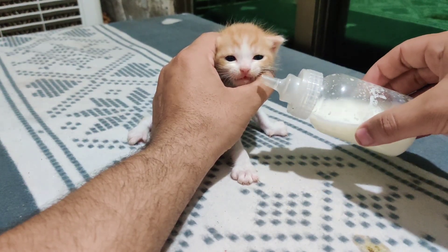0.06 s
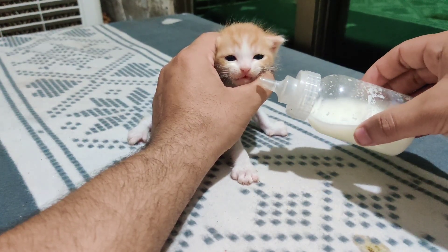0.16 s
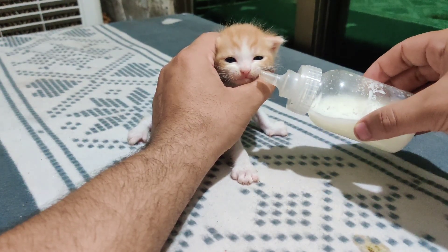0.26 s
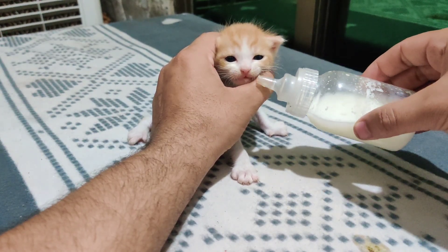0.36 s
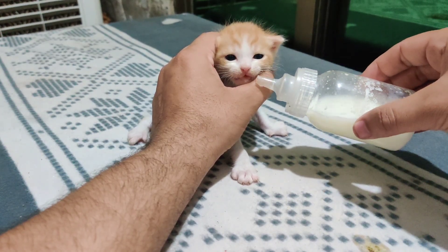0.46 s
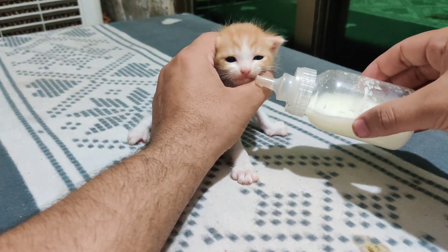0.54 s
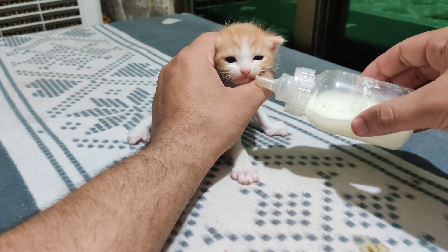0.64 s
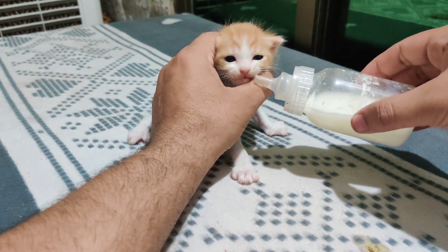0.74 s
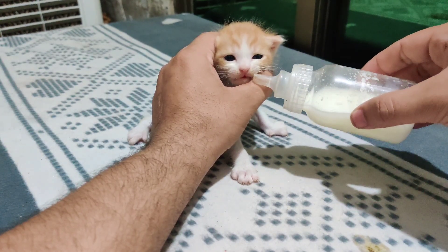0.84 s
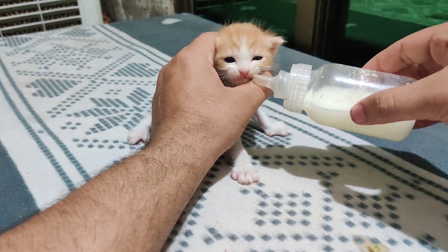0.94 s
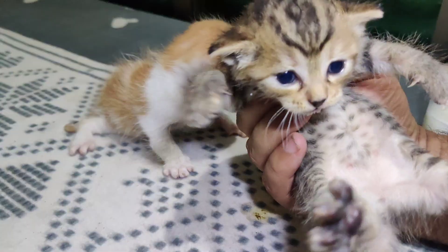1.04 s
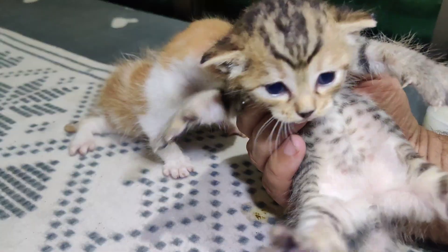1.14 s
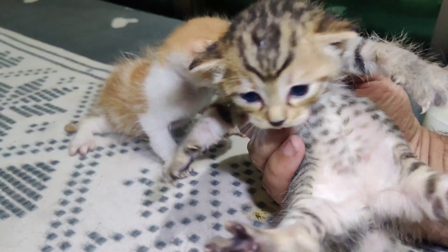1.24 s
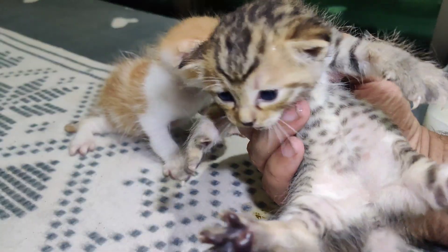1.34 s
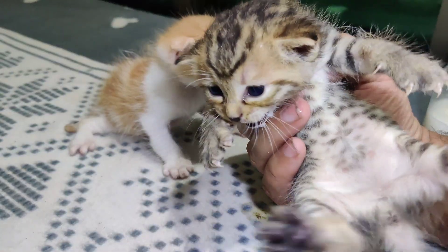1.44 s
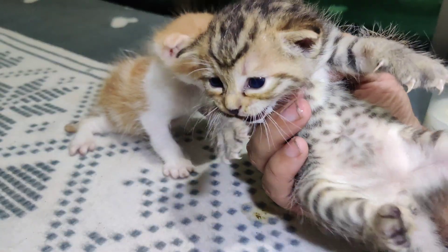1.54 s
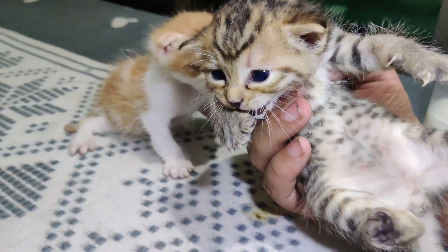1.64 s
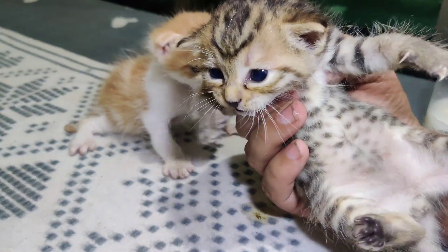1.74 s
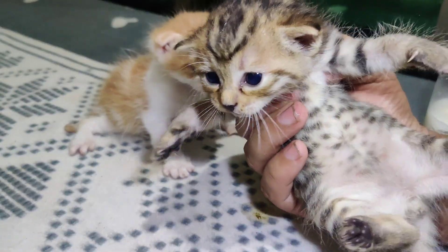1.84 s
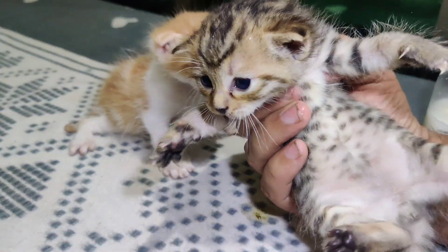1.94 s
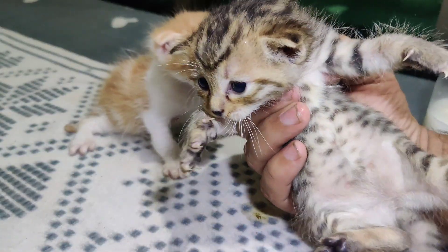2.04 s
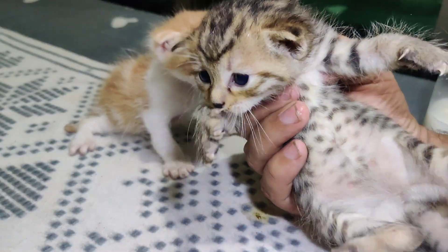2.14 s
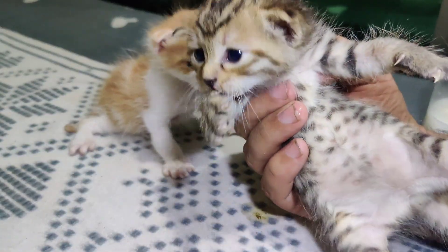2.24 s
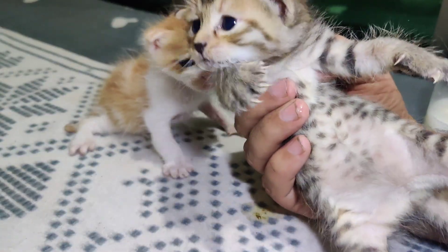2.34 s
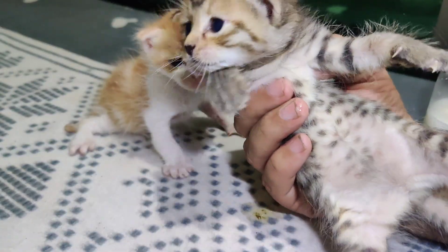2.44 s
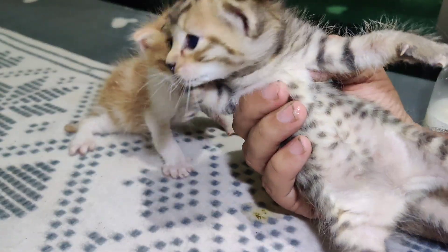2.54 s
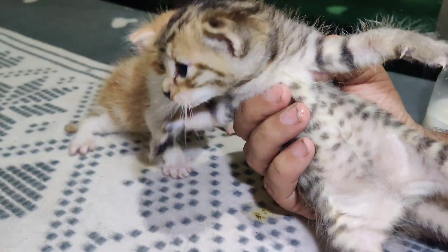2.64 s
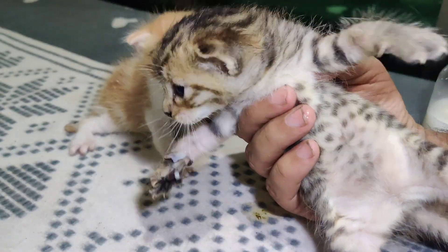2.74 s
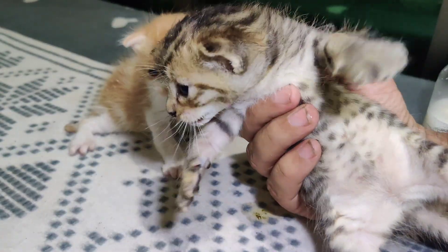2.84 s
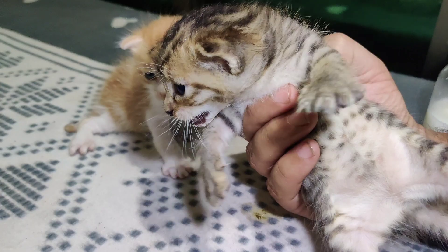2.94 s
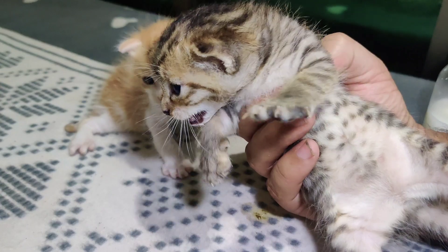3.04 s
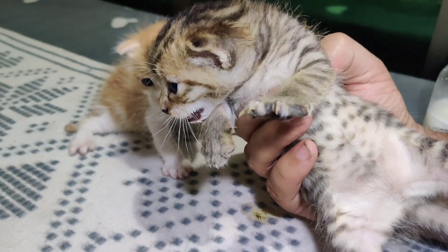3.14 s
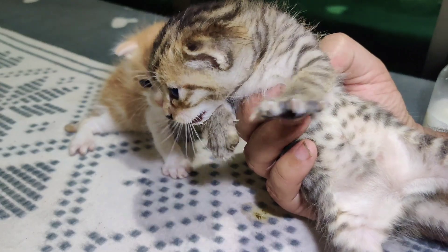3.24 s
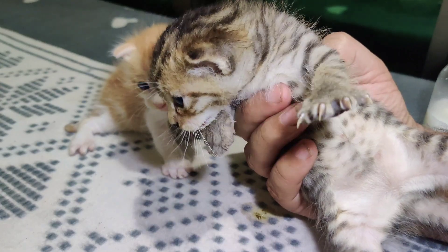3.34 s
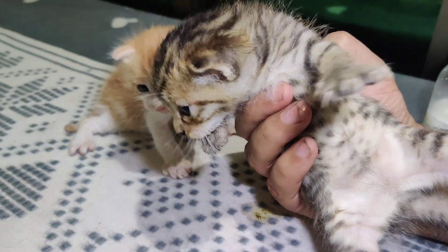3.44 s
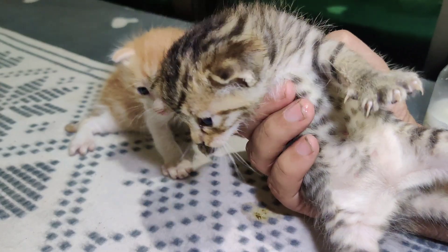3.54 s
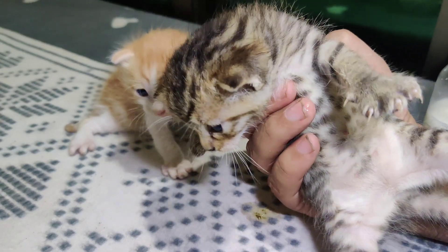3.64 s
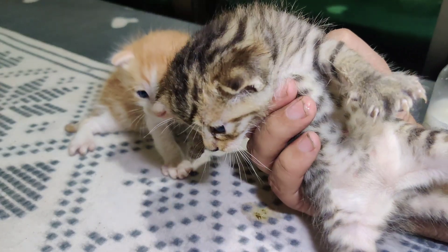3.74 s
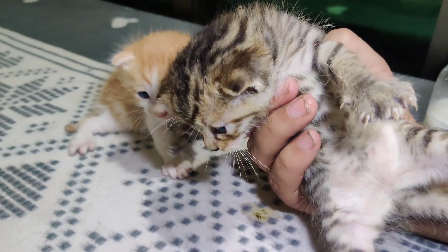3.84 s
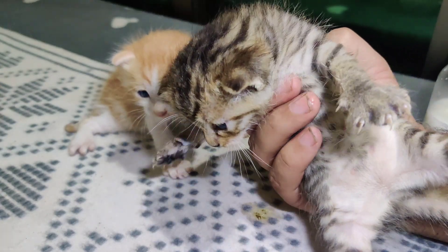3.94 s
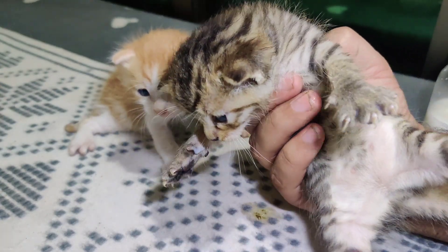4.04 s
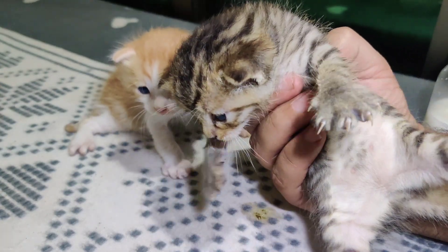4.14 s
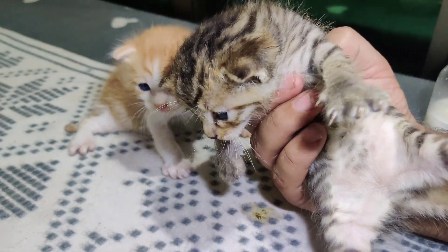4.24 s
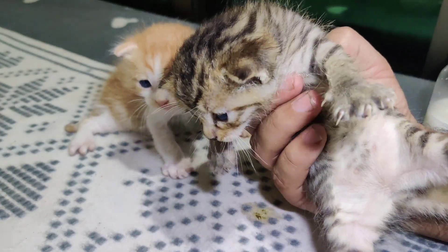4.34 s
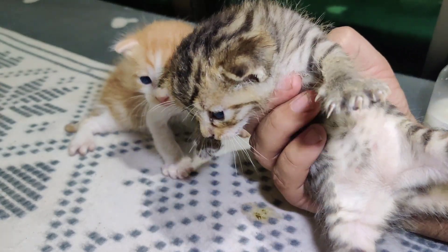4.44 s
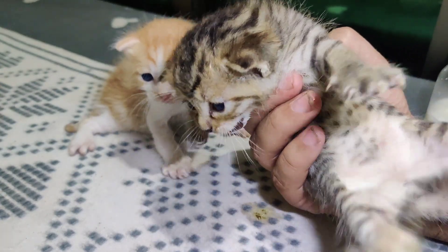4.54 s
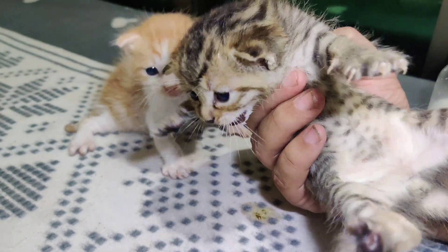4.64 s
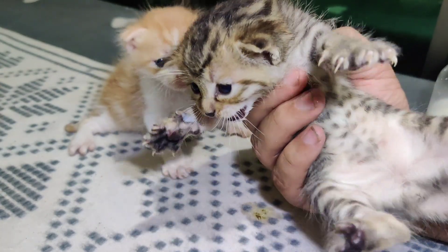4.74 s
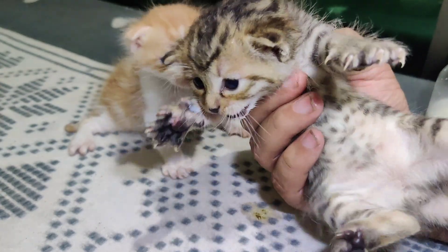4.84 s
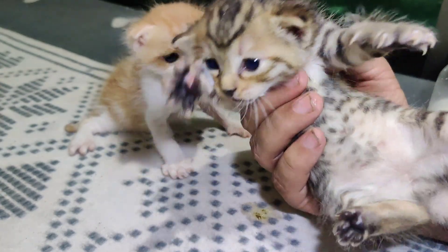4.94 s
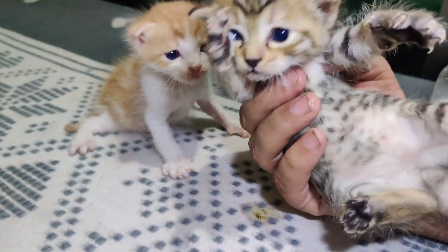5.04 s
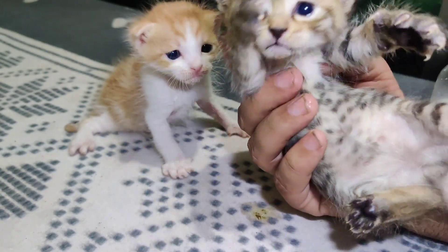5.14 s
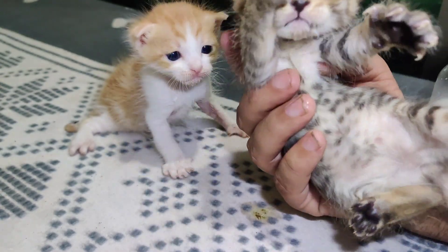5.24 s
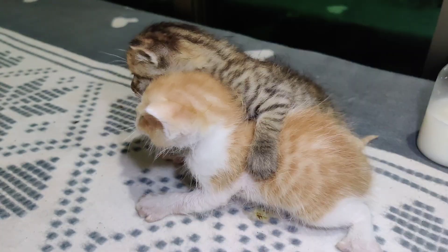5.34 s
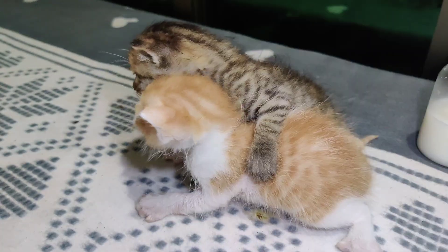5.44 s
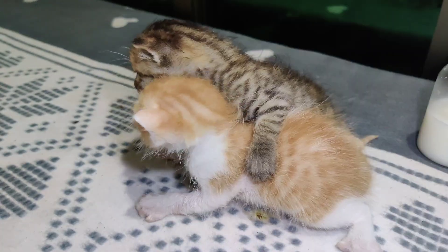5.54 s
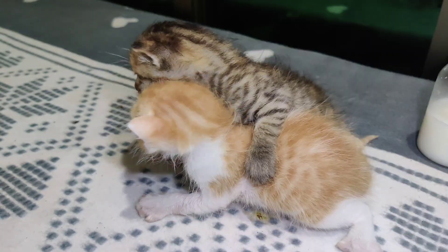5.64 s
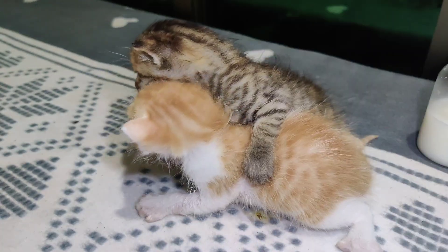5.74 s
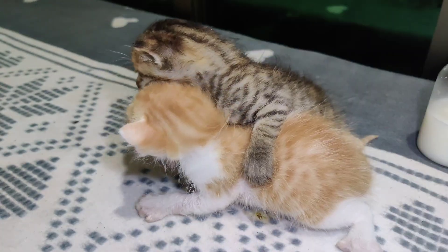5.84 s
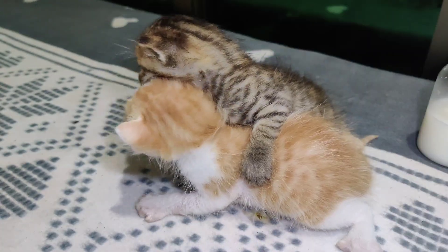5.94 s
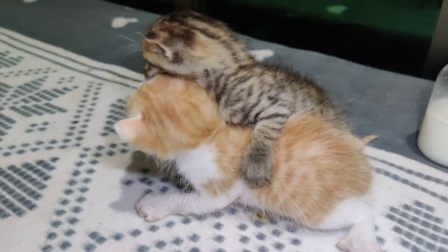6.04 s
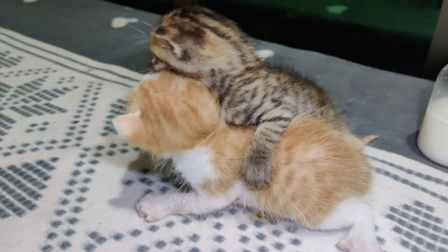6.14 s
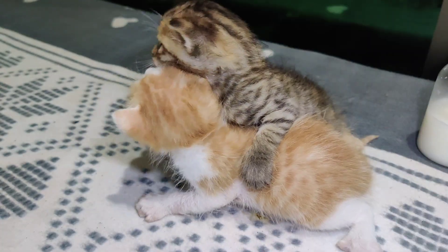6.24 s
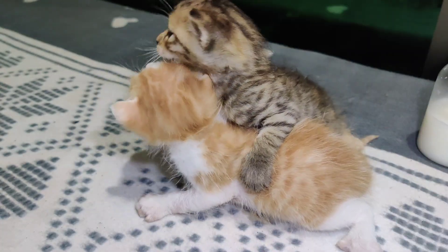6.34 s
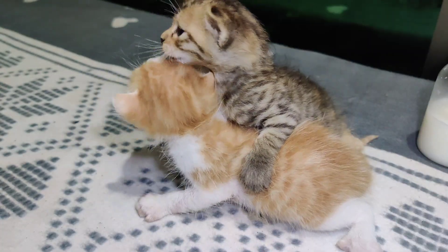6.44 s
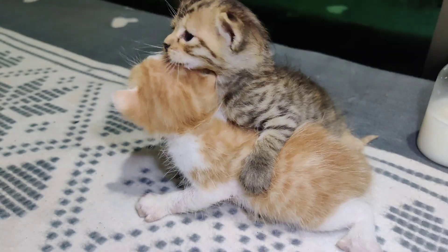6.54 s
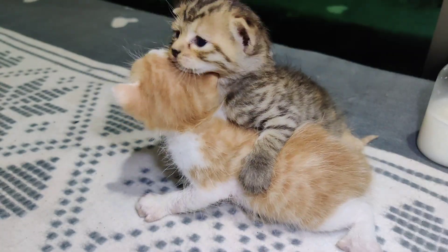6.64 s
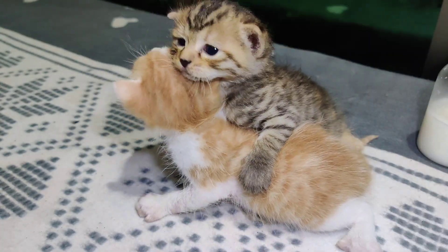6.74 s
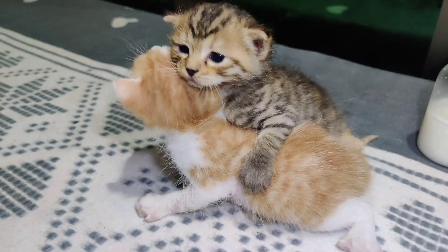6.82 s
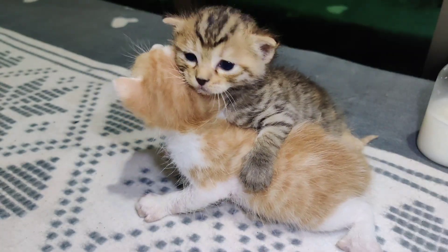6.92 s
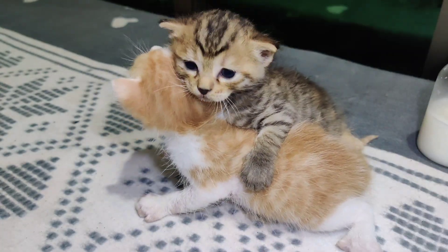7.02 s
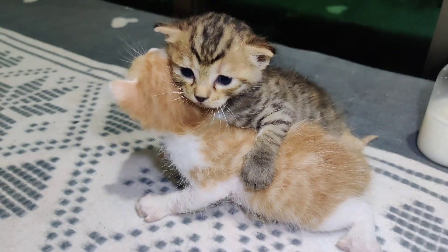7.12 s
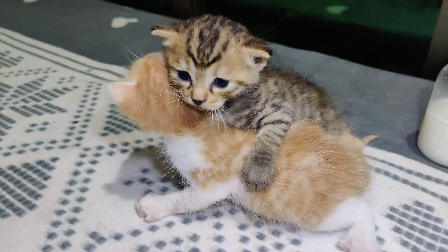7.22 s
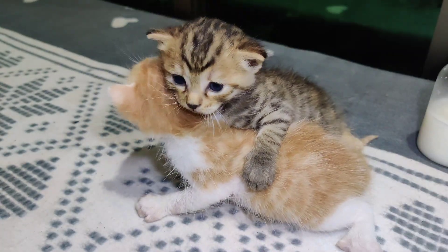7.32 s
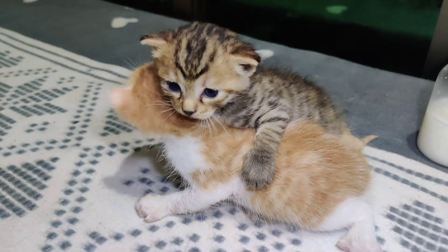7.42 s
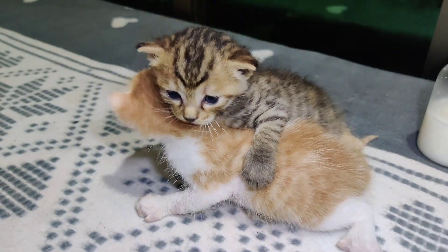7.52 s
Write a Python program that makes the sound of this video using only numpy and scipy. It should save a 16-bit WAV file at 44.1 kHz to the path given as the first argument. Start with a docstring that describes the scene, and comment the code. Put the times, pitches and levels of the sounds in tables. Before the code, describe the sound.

A young kitten gives a faint mew and three high, arching meows close by, with soft blanket rustles over a faint fan-like hum.

```python
"""A young kitten, close by in a small room, gives one faint mew and three high, arching meows.
Its vocal folds radiate a harmonic series, raspy or croaky where they vibrate irregularly; as the mouth
closes the overtones fade to an almost pure tone. Paws strike and rub the bedding, the walls reflect
faintly, and a fan-like rush and hum lie beneath. A click precedes the mew; at a second click
the last meow and its echo stop short."""
import sys
import numpy as np
from scipy import signal
from scipy.fft import rfft, irfft, next_fast_len
from scipy.io import wavfile
from scipy.ndimage import map_coordinates

SR = 44100
rng = np.random.default_rng(int(sys.argv[2]) if len(sys.argv) > 2 else 0)


def int16_out(signal):
    """Quantize to a 16-bit WAV file."""
    q = np.round(np.clip(np.atleast_2d(signal).T, -1, 1) * 32767)
    wavfile.write(sys.argv[1], SR, q.astype(np.int16))


N = 334278
TIME = np.arange(N) / SR

# Fundamental of each call: t/s, f/Hz, level/dB
MEW = [(1.009, 973, -71), (1.061, 975, -46), (1.111, 947, -45.5), (1.16, 856, -62.5), (1.21, 725, -72)]
MEOW_1 = [(1.483, 528, -64), (1.5, 632.5, -57), (1.515, 833, -50), (1.536, 850, -50), (1.555, 925, -72),
          (1.583, 1159, -57), (1.606, 1263, -57), (1.625, 1350, -46.5), (1.659, 1393, -35),
          (1.679, 1422, -36), (1.729, 1439, -33), (1.789, 1446, -30.5), (1.839, 1428, -32.5),
          (1.9, 1392, -32.5), (1.94, 1345, -30.3), (2.01, 1207, -36), (2.04, 1141, -40.5),
          (2.067, 1006, -61), (2.12, 690, -59)]
MEOW_2 = [(3.01, 730, -58.5), (3.04, 829, -54.5), (3.065, 924, -64), (3.094, 1035, -59.5),
          (3.165, 1271, -56), (3.194, 1316, -40), (3.221, 1391, -49), (3.243, 1422, -37),
          (3.301, 1455, -33), (3.339, 1401, -33), (3.401, 1447, -29.5), (3.47, 1373, -30.5),
          (3.535, 1320, -32.5), (3.555, 1255, -35), (3.574, 1140, -48.5)]
MEOW_3 = [(4.585, 526, -56), (4.598, 659, -56.5), (4.612, 806, -39), (4.639, 943, -41), (4.648, 969, -34.5),
          (4.679, 1112, -38.5), (4.695, 1158, -42), (4.808, 1421, -32), (4.897, 1392, -32),
          (4.934, 1415, -31.5), (4.963, 1459, -29.5), (5.011, 1371, -32.5), (5.053, 1403, -30.5),
          (5.221, 1294, -30.5), (5.263, 1205, -34.5), (5.29, 1140, -40.5)]
# Mouth gesture per call: shrill onset t/s, level/dB, rise/s, fall/s;
# open vowel t/s, rise/s, hold/s, level/dB, fall/s
MOUTH = [(1.051, -55, .055, 0.073, 1.1, .073, .014, -74, .12),
         (1.644, -34.5, 0.04, 0.12, 1.76, 0.072, 0.064, -39.5, 0.12),
         (3.133, -36.5, 0.026, 0.088, 3.28, 0.063, 0.018, -48, 0.1),
         (4.737, -32, 0.075, 0.03, 4.825, .047, .11, -35, 0.23)]
# Timbre per call: nasal gain/dB, gain/dB of harmonics 3, 4 and 5, tension exponent of 5, roughness
TIMBRE = [(-15, -15, -9, -6, 8, 0.5), (3, -19.5, 4.5, -2, 8, 0.36), (-10.5, -21.5, -4.5, 1, 16, 0.6),
          (4.5, -16.5, 5, 0, 3, .6)]
# Closed-mouth spectrum: gain/dB of harmonics 2, 3 and 4
CLOSED_DB = (-45.5, -51.5, -57.5)
# Throat transmission for harmonics 4 and 5: f/Hz, gain/dB
THROAT_TREBLE = [(3500, -50.5), (4700, -29.5), (5100, -33), (5400, -34), (5720, -24), (6000, -31),
                 (6250, -25.5), (6650, -12), (6900, -23.5), (7100, -55)]
# Period doubling: centre t/s, half duration/s, level/dB at 1.5 and at 3.5 times the pitch
CROAKS = [(1.587, 0.017, -54, -44), (1.605, 0.012, -61, -43.5), (3.101, 0.011, -66, -55.5),
          (3.207, .04, -71, -77), (4.66, 0.018, -54, -53.5), (4.687, 0.014, -61, -60.5)]


def meows(jitter=0.0025, slack_jitter=0.07, shimmer_db=0.29, full_voice_db=-35,
          taut_hz=1268, slackest_hz=780, slack_db_per_octave=27, nose_hz=1580, nose_width_hz=280):
    """Source and filter: the opening, open and closing mouth favour fold harmonics 3, 2 and 1 in turn."""
    unsteady = 1 + 0.004 * wobble(120) + jitter * wobble(1300)
    flutters = [flutter(k) for k in range(1, 6)]
    low_croak = strokes([(s, half_s, db) for s, half_s, db, _ in CROAKS])
    high_croak = strokes([(s, half_s, db) for s, half_s, _, db in CROAKS])
    shake = wobble(420)
    voice = np.zeros(N)
    for call, mouth, timbre in zip((MEW, MEOW_1, MEOW_2, MEOW_3), MOUTH, TIMBRE):
        nasal_db, third_db, fourth_db, fifth_db, fifth_power, roughness = timbre
        times, pitches, levels = np.transpose(call)
        on = (TIME >= times[0]) & (TIME < times[-1])
        pitch = np.interp(TIME[on], times, pitches)
        level_db = np.interp(TIME[on], times, levels)
        shrill, vowel = [gain[on] for gain in mouth_gains(mouth)]
        effort = np.sqrt(amp(level_db - full_voice_db))
        tension = np.minimum(pitch / taut_hz, 1)
        # Slack folds buzz with overtones, almost regardless of effort, and vibrate unevenly.
        t = np.arange(len(pitch)) / SR
        fade = np.minimum(np.minimum(t, t[-1] - t) / 0.01, 1)
        slack_octaves = np.log2(taut_hz / np.maximum(pitch, slackest_hz))
        buzz = amp(full_voice_db + slack_db_per_octave * slack_octaves) * effort ** 0.14 * fade
        uneven = slack_jitter * (1 - tension) * shake[on]
        phase = 2 * np.pi * np.cumsum(pitch * (unsteady[on] + uneven)) / SR
        nasal_lift = 1 + peaks([(nose_hz, nose_width_hz, nasal_db)], 2 * pitch)
        second = np.hypot(vowel, buzz * amp(CLOSED_DB[0]) * nasal_lift)
        # The third harmonic fades faster than the second as the mouth shuts.
        open_third = amp(third_db) * vowel.max() * (vowel / vowel.max()) ** 2.7
        mouth_third = np.hypot(shrill, open_third)
        third = mouth_third + buzz * amp(CLOSED_DB[1])
        # The top harmonics need taut folds and effort, and sweep through the throat's peaks.
        brightness = effort * mouth_third ** 0.82
        fourth = brightness * tension ** 4 * amp(fourth_db + along(THROAT_TREBLE, 4 * pitch))
        fourth += buzz * amp(CLOSED_DB[2])
        fifth = brightness * tension ** fifth_power * amp(fifth_db + along(THROAT_TREBLE, 5 * pitch))
        for k, rms in enumerate([amp(level_db), second, third, fourth, fifth], 1):
            voice[on] += rms * np.exp(1j * k * phase + roughness * flutters[k - 1][on]).imag
        for k, croak in ((1, low_croak), (3, high_croak)):
            voice[on] += croak[on] * np.exp(1j * (k + 0.5) * phase + flutters[k - 1][on]).imag
    return np.sqrt(2) * voice * amp(shimmer_db * wobble(100))


def mouth_gains(gesture):
    """Articulation: the moving mouth passes a shrill onset, then an open vowel; one gain for each."""
    shrill_s, shrill_db, rise_s, fall_s, open_s, opening_s, hold_s, vowel_db, closing_s = gesture
    shrill = amp(shrill_db) * swell(shrill_s, rise_s, fall_s, fall_shape=1)
    vowel = amp(vowel_db) * swell(open_s, opening_s, closing_s, hold_s, fall_shape=1.72)
    return shrill, vowel


def flutter(harmonic, spread=0.11, fray=0.013):
    """Random modulation of amplitude (real) and phase (imaginary) broadens higher harmonics more."""
    smear = wobble(260) / 4 + 1j * wobble(260)
    skirt = wobble(800) + 1j * wobble(800)
    return spread * harmonic ** 1.4 * smear + fray * harmonic ** 1.7 * skirt


# Fold rattles: peak t/s, level/dB, rise/s, hold/s, fall/s, mouth resonance f/Hz, glide/(Hz/s)
RATTLES = [(1.012, -65.5, .007, .008, 0.031, 3230, -1500), (1.573, -43.5, 0.026, .042, 0.02, 4240, 4499),
           (1.64, -56, 0.028, 0.0081, 0.07, 4380, 501), (3.1, -67, 0.045, .002, 0.03, 3690, 4494.5),
           (3.185, -61, .04, .02, 0.047, 3850, 3499.5), (4.716, -54, .06, .02, 0.12, 3470, 4001.5),
           (4.962, -63.5, 0.19, 0.017, .04, 3610, 1)]
# Throat resonances: f/Hz, width/Hz, gain/dB
THROAT_FORMANTS = [(1720, 150, -2), (3370, 280, -5), (4720, 330, -4), (6050, 400, -14), (6680, 280, -3)]


def rasp(hiss_db=-31.5, hiss_hz=4230, hiss_width_hz=540, flutter_db=2, scatter_hz=230, throat_db=-7):
    """Aperiodic excitation: the open mouth hisses, and rattling folds drive mouth and throat formants."""
    drive = amp(hiss_db) * sum(sum(mouth_gains(gesture)) for gesture in MOUTH)
    mouth = drive * band_noise(hiss_hz, hiss_width_hz)
    for s, db, rise_s, hold_s, fall_s, mouth_hz, glide in RATTLES:
        rattle = amp(db) * swell(s, rise_s, fall_s, hold_s)
        squeal_hz = mouth_hz + glide * (TIME - s) + scatter_hz * wobble(900)
        squeal = np.sin(2 * np.pi * np.cumsum(squeal_hz) / SR)
        mouth += rattle * unit(amp(flutter_db * wobble(900)) * squeal)
        drive += rattle
    harshness = (drive / drive.max()) ** 0.49  # the throat answers mainly to strong drive
    throat = noise(lambda hz: peaks(THROAT_FORMANTS, hz))
    return mouth + amp(throat_db) * drive * harshness * throat


# Paw contacts: t/s, relative tick level/dB, relative bump level/dB
PAW_CONTACTS = [(3.555, -35, -30), (3.599, -55, -44), (3.908, -64, -49), (3.929, -42, -67),
                (4.273, -41.5, -70), (4.645, -25.5, -32), (4.653, -43.5, -53), (4.661, -30.5, -28),
                (4.667, -37, -28.5), (4.68, -32, -33)]
# Modes of a bump: f/Hz, gain/dB, T60/s
BUMP_MODES = [(205, -22, 0.22), (240, 0, 0.11), (328, 0, 0.044), (602, -10, 0.066)]
# Claw drags: centre t/s, half duration/s, level/dB
SCRATCHES = [(3.048, 0.0086, -65.5), (3.575, 0.021, -67.5), (4.668, 0.019, -49.5)]
# Spectrum of a claw on cloth: f/Hz, gain/dB
CLAW_SPECTRUM = [(400, 4), (1500, 5), (2500, -4.5), (4000, -3), (5500, -6), (6700, -1), (7500, -16),
                 (12000, -27)]


def paws(tick_t60_s=0.0097, tick_gain_db=-8, attack_s=0.0034, snag_db=3):
    """Impact and friction: landing paws excite damped modes; claws tick and drag on the threads."""
    ticks, bumps = np.zeros((2, N + SR))
    t = np.arange(SR // 4) / SR
    for s, tick_db, bump_db in PAW_CONTACTS:
        span = slice(round(s * SR), round(s * SR) + len(t))
        ring = sum(amp(db + rng.standard_normal() - 60 * t / t60) * np.sin(2 * np.pi * hz * t)
                   for hz, db, t60 in BUMP_MODES)
        ticks[span] += amp(tick_db + tick_gain_db - 60 * t / tick_t60_s)
        bumps[span] += amp(bump_db) * ring * (1 - np.exp(-t / attack_s))
    drag = strokes(SCRATCHES) * amp(snag_db * wobble(500))
    cloth = noise(lambda hz: amp(along(CLAW_SPECTRUM, hz)))
    return bumps[:N] + (ticks[:N] + drag) * cloth


# Hands and fur on the blanket, and the mattress giving: centre t/s, half duration/s, level/dB
BLANKET_RUBS = [(.15, 0.99, -61), (.8, 1, -55), (.765, 0.0047, -50), (.82, 0.0094, -42),
                (2.12, 0.0087, -51), (2.145, 0.006, -45), (3.63, 0.24, -52.5), (4.3, 0.13, -53.5),
                (4.9, 1, -57), (6.68, 0.088, -60), (6.92, 0.074, -54.5)]
MATTRESS_RUMBLES = [(.55, 1, -56), (4.52, 0.36, -55), (4.585, 0.046, -46), (4.95, 0.15, -51.5)]


def bedding():
    """Sliding friction makes muffled noise on the blanket; the mattress rumbles under a shifting load."""
    rub = strokes(BLANKET_RUBS) * band_noise(centre_hz=450, width_hz=420)
    rumble = strokes(MATTRESS_RUMBLES) * band_noise(centre_hz=135, width_hz=40)
    return rub + rumble


# Reverberation time of the room: f/Hz, T60/s
ROOM_DECAY = [(200, 0.29), (1400, 0.5), (6000, 0.27)]


def reflections(source, reverb_db=-21, wall_delay_s=0.04, wall_db=-19):
    """Reflection: one far-wall echo and a diffuse tail in which each frequency decays at its own rate."""
    hz, t, spectrum = signal.stft(rng.standard_normal(SR // 2), SR, nperseg=256)
    decay = amp(-60 * t / along(ROOM_DECAY, hz)[:, None])
    tail = signal.istft(spectrum * decay, SR, nperseg=256)[1]
    delayed = np.pad(source, (SR // 200, 0))
    reverb = signal.fftconvolve(delayed, tail / np.linalg.norm(tail))[:N]
    echo = np.pad(source, (round(wall_delay_s * SR), 0))[:N]
    return amp(reverb_db) * reverb + amp(wall_db) * echo


# Spectral density of the rush: f/Hz, relative level/dB
RUSH_SPECTRUM = [(35, -65.5), (60, -26.5), (91, -18), (103, -22), (151, -1.5), (254, -8), (394, -6.5),
                 (463, -9), (589, -7), (1030, -12), (2000, -22.5), (3430, -31.5), (4280, -38.5),
                 (6380, -41.5), (7200, -50.5), (9360, -33.5), (15800, -38.5)]
# Added colour of the rush before the first click: f/Hz, gain/dB
EARLY_COLOUR = [(150, 0), (450, 3), (1100, -2), (1800, 1), (2800, -4.5), (5000, 0)]
# Hum tones: f/Hz, width/Hz, level/dB
HUM_TONES = [(150.37, 1.2, -61), (124, 15, -67), (185.8, 3.6, -67), (402.6, 6.9, -65), (441.8, 9.9, -65)]


def rush_and_hum(rush_db=-51.5):
    """Broadband noise is heard as rushing air, narrowband noise as wavering, fan-like hum."""
    rush = noise(lambda hz: amp(along(RUSH_SPECTRUM, hz)))
    early_rush = filtered(rush, lambda hz: amp(along(EARLY_COLOUR, hz)))
    rush = np.where(TIME < CLICKS[0][0], early_rush, rush)
    hum = sum(amp(db) * band_noise(hz, width) for hz, width, db in HUM_TONES)
    return amp(rush_db) * rush + hum


# Clicks before the mew and at the end of the last meow: t/s, level/dB
CLICKS = [(1.006, -47.5), (5.291, -37)]


def clicks(decay_s=0.00063):
    """A step with a fast exponential decay has a broad spectrum and is heard as a click."""
    return sum(amp(db) * (TIME >= s) * np.exp(-np.abs(TIME - s) / decay_s) for s, db in CLICKS)


def amp(db):
    """Decibels to amplitude ratio."""
    return 10 ** (np.asarray(db) / 20)


def unit(x):
    """Normalisation to rms 1."""
    return x / np.sqrt(np.mean(x ** 2) + 1e-20)


def along(points, hz):
    """Interpolation of (f/Hz, value) points on a logarithmic frequency axis."""
    f, values = np.transpose(points)
    return np.interp(np.log(hz + 1), np.log(f + 1), values)


def peaks(modes, hz):
    """Magnitude response of steep-sided resonances (f/Hz, width/Hz, gain/dB)."""
    return sum(amp(db) / (1 + ((hz - centre) / width) ** 2) ** 2 for centre, width, db in modes)


def wobble(rate):
    """Smooth random modulation with rate knots a second."""
    knots = rng.standard_normal(int(N * rate / SR) + 4)
    return map_coordinates(knots, [TIME * rate])


def filtered(x, response):
    """Linear filtering: the spectrum of x times a frequency response."""
    size = next_fast_len(N + SR // 2)
    return irfft(rfft(x, size) * response(np.fft.rfftfreq(size, 1 / SR)), size)[:N]


def noise(response):
    """Spectrally shaped Gaussian noise of rms 1."""
    return unit(filtered(rng.standard_normal(N), response))


def band_noise(centre_hz, width_hz):
    """Random excitation of a single resonance, rms 1."""
    return noise(lambda hz: peaks([(centre_hz, width_hz, 0)], hz))


def swell(s, rise_s, fall_s, hold_s=0, fall_shape=2):
    """Envelope reaching 1 at time s; 20 dB down rise_s earlier and fall_s after the hold."""
    early = np.maximum(s - TIME, 0) / rise_s
    late = np.maximum(TIME - s - hold_s, 0) / fall_s
    return amp(-20 * np.minimum(early ** 2 + late ** fall_shape, 10))


def strokes(rows):
    """Incoherent addition: swells (t/s, half duration/s, level/dB) sum in power."""
    return np.sqrt(sum((amp(db) * swell(s, half_s, half_s)) ** 2 for s, half_s, db in rows))


def scene():
    """Superposition: the kitten and its echoes, silent from the last click on, over bedding and air."""
    kitten = meows() + rasp() + paws()
    kitten_in_room = (kitten + reflections(kitten)) * (TIME < CLICKS[-1][0])
    return (kitten_in_room + bedding() + rush_and_hum())[None]


def record(dry, low_cut_hz=100, treble_edge_hz=7240, top_hz=15800):
    """Band limiting: deep bass is cut and the top treble falls 30 dB; the added clicks stay brighter."""
    high_pass = signal.butter(4, low_cut_hz, "high", fs=SR, output="sos")
    sound = signal.sosfilt(high_pass, dry[0])
    sound = filtered(sound, lambda hz: amp(-np.clip((hz - treble_edge_hz) / 10, 0, 30)))
    return filtered(sound + clicks(), lambda hz: hz < top_hz)[None]


dry = scene()
out = record(dry)
int16_out(out)
```